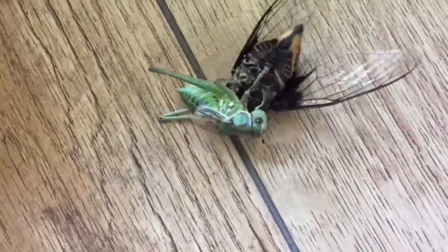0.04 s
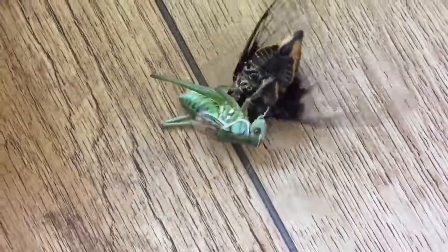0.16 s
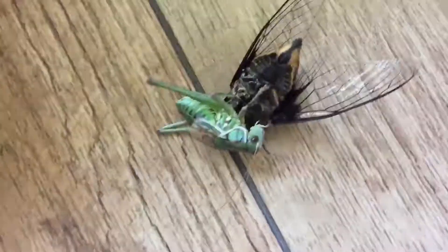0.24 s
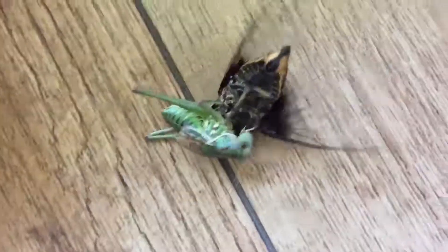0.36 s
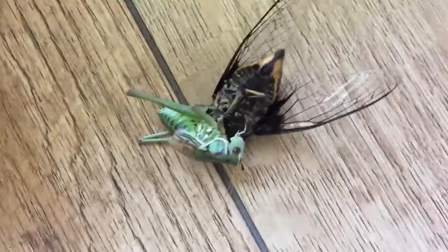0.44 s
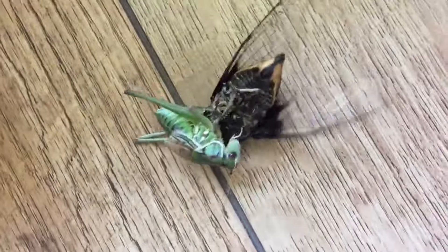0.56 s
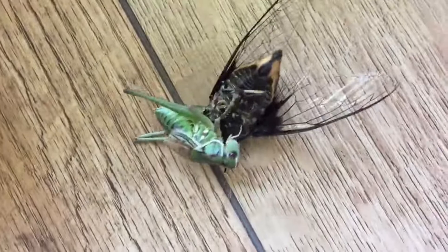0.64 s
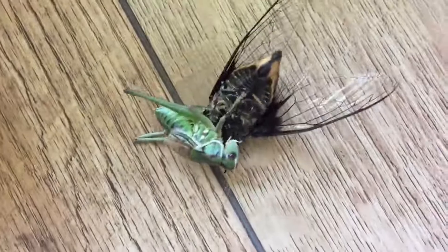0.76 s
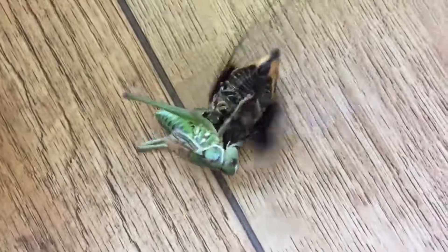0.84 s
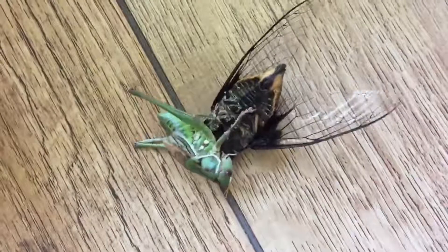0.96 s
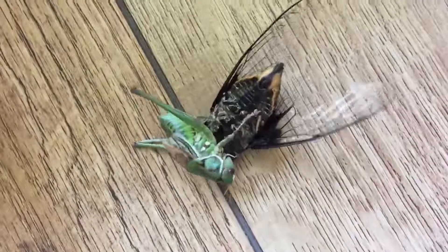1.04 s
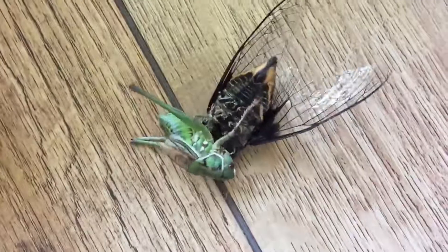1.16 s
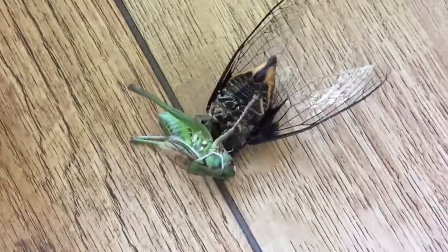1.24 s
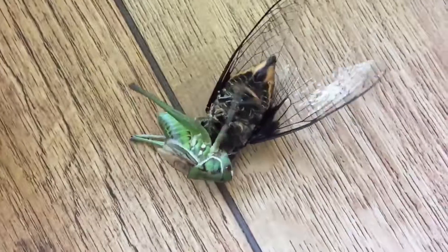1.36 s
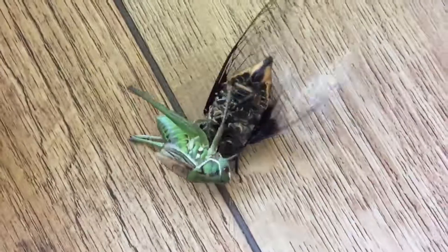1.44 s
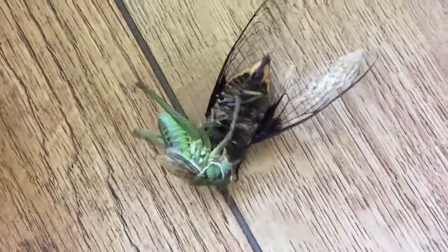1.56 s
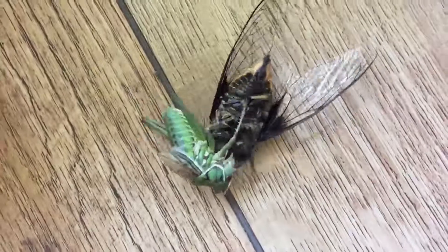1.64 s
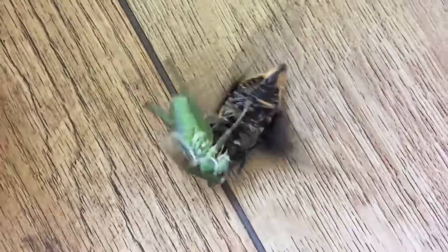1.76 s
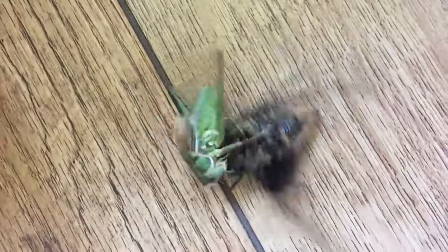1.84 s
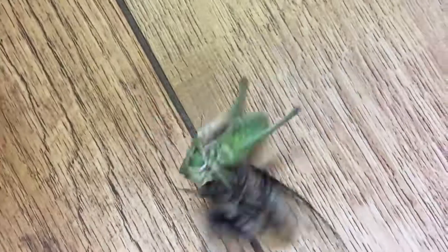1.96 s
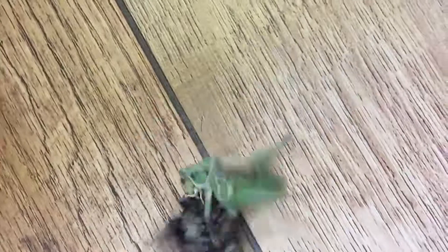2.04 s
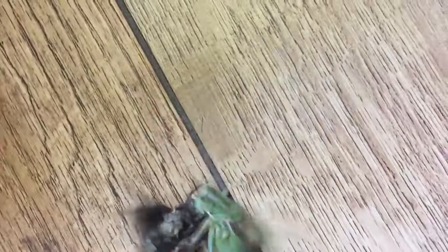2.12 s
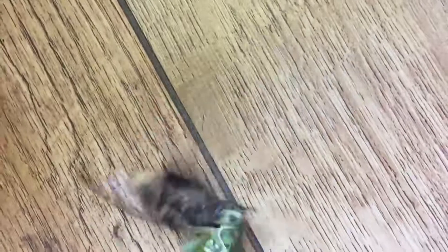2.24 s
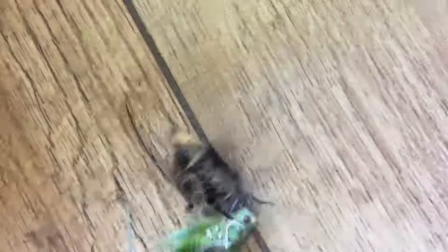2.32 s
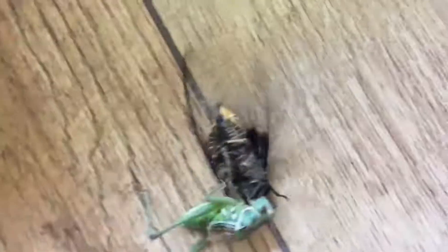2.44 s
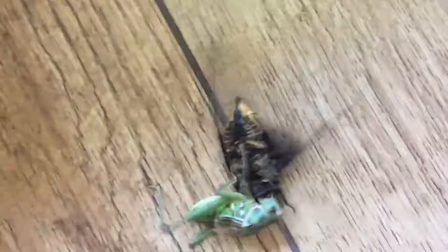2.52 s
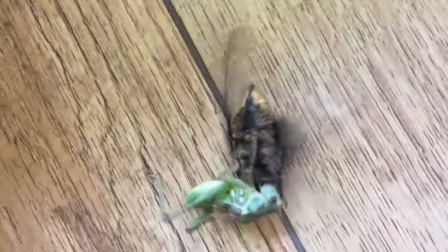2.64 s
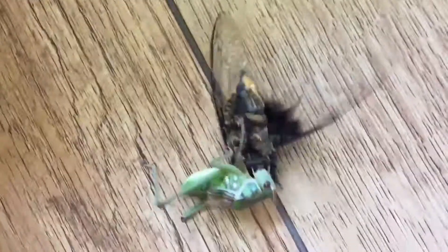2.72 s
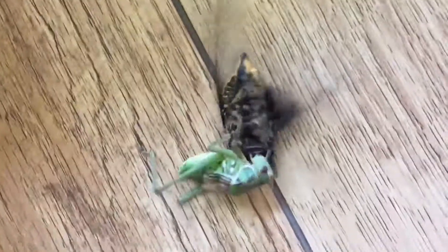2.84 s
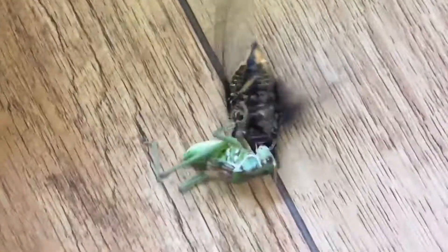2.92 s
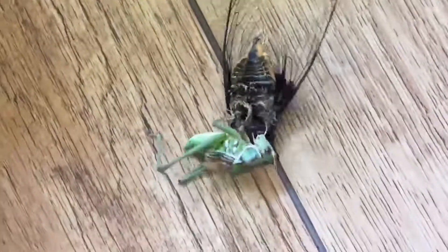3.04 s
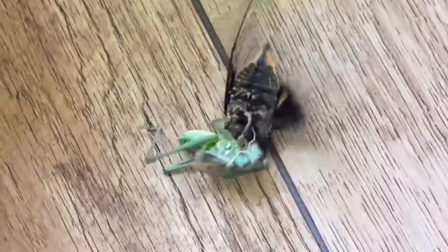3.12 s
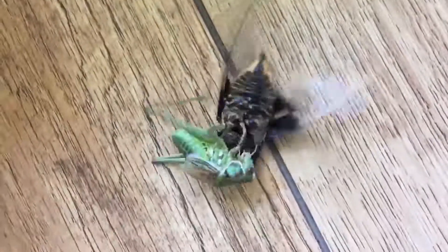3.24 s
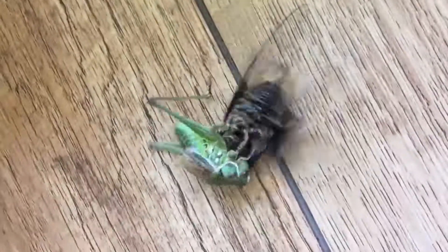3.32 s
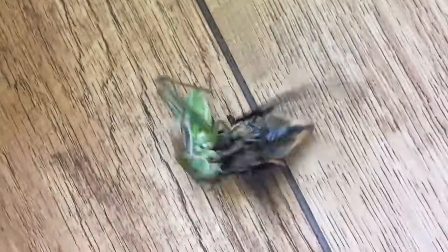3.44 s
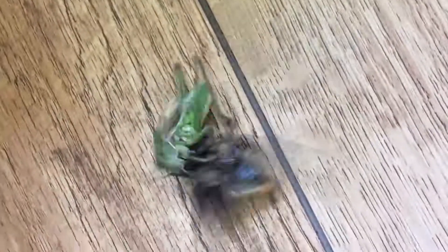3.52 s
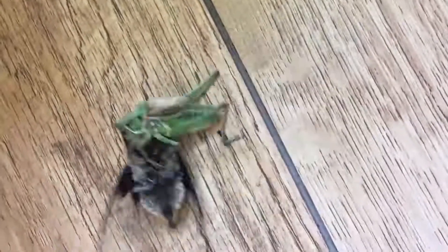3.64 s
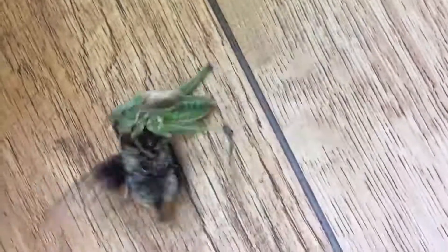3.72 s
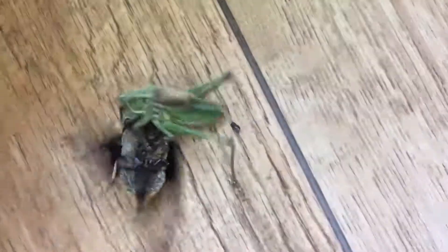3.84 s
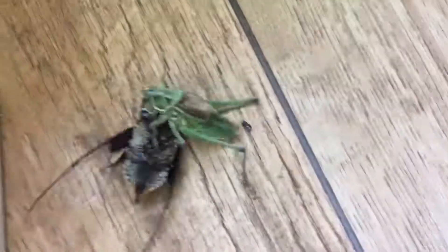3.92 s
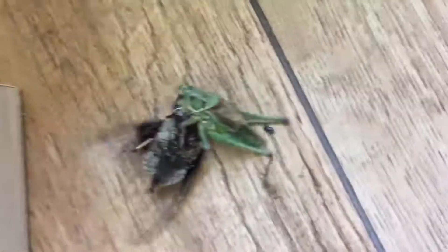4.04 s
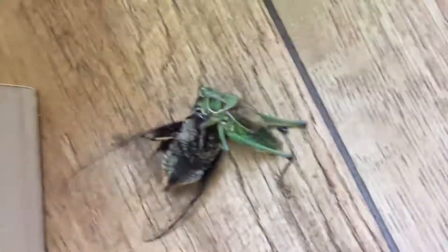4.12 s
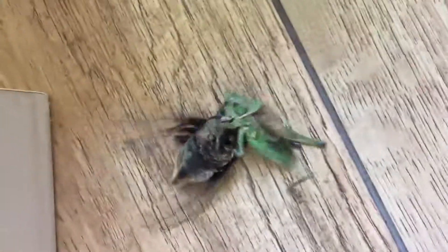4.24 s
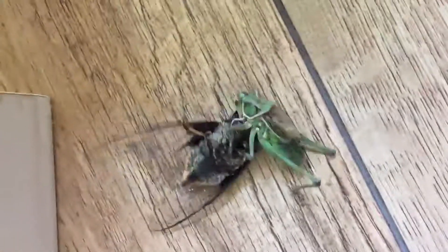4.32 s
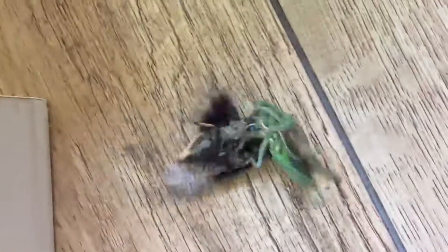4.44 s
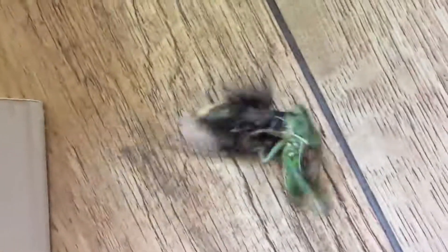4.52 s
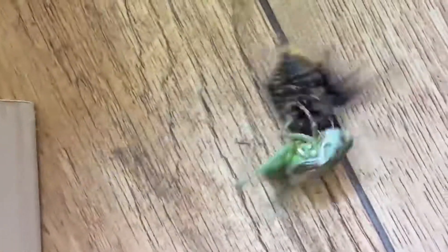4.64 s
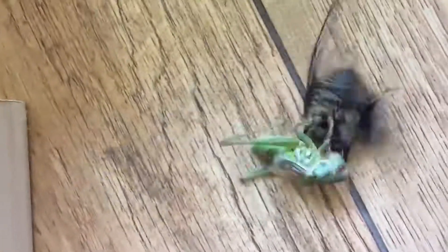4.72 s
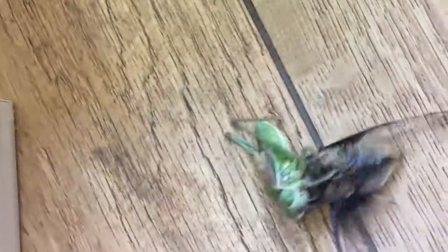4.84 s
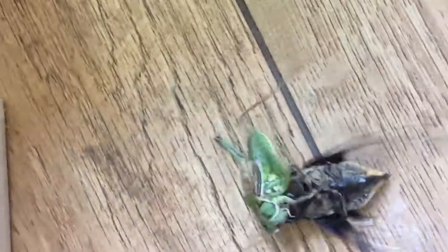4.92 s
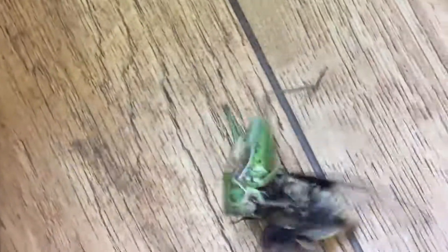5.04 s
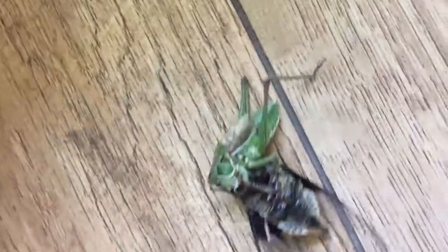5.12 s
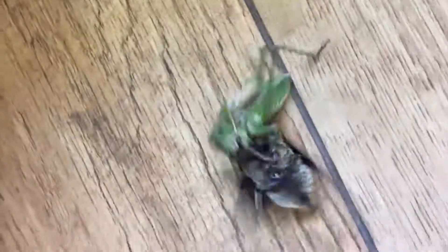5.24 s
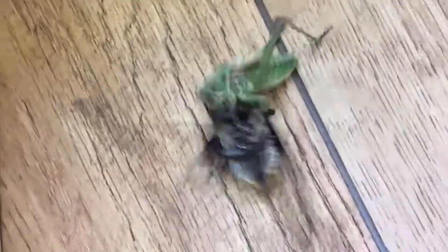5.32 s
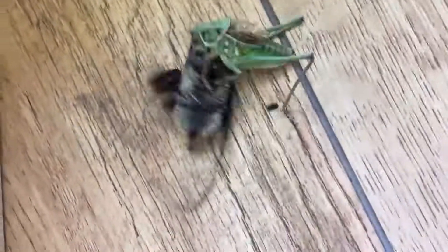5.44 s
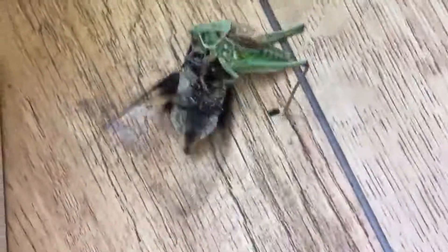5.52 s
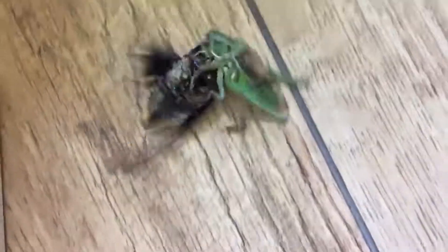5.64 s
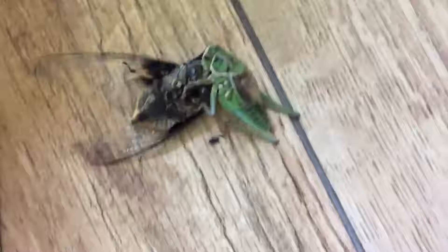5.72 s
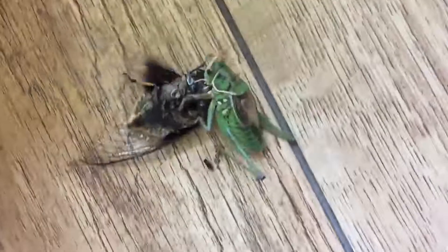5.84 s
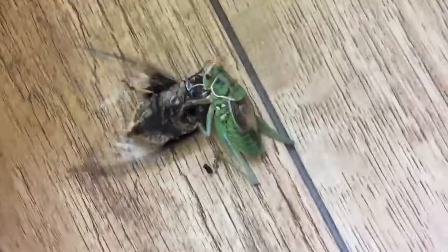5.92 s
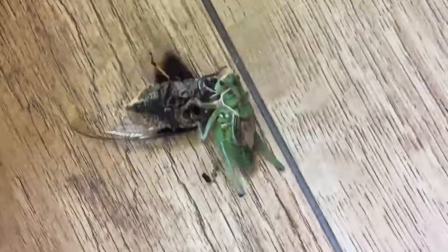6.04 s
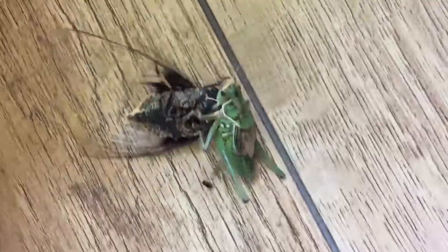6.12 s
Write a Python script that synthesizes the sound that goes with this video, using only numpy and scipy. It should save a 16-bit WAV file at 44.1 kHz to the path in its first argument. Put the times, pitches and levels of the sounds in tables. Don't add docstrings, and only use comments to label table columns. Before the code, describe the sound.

A large insect's stiff wings slap wooden boards, first singly, then in fast rattling bursts, as a rough drone and hiss swell outside.

```python
import sys
import numpy as np
from scipy import signal
from scipy.fft import rfft, irfft, next_fast_len
from scipy.io import wavfile
from scipy.ndimage import uniform_filter1d

SR = 44100
rng = np.random.default_rng(int(sys.argv[2]) if len(sys.argv) > 2 else 0)


def invert_db(x):
    u = np.asarray(x, float) / 20
    return 10 ** u


def to_wav(sig):
    pcm = np.clip(np.atleast_2d(sig), -1, 1) * 32767
    pcm = np.round(pcm).astype(np.int16)
    wavfile.write(sys.argv[1], SR, pcm.T)


N = 272097
STROKE, LONG = 2048, next_fast_len(N)

# (f/Hz, width/Hz, level/dB)
WING_MODES = [(357.4, 157, -15.5), (588, 260, -20.5), (1337, 1125, -5.5), (2388, 507, 1.5), (3187, 564, -3),
              (4390, 680, -3.5), (5150, 515, -2), (6154, 880, -0.5), (7055, 1230, -2), (9130, 2060, -5.5),
              (11534, 1120, -5), (13540, 2300, -8)]
# (f/Hz, width/Hz)
OVERTONES = [(1408, 190), (1750, 190), (2120, 95)]


def level(x, db):
    return x * invert_db(db) / np.sqrt(np.mean(x ** 2))


def modes(table, size):
    f = np.fft.rfftfreq(size, 1 / SR)
    total = 0
    for k, (hz, width, db) in enumerate(table):
        damping = 1j * f * width
        total = total + (-1) ** k * invert_db(db) * damping / (hz ** 2 - f ** 2 + damping)
    return total


def shape(x, response):
    return irfft(rfft(x) * response, x.shape[-1])


def band(hz, width):
    noise = rng.standard_normal(LONG)
    return level(shape(noise, modes([(hz, width, 0)], LONG) ** 2)[:N], 0)


def curve(table, col):
    table = np.array(table)
    return np.interp(np.arange(N) / SR, table[:, 0], table[:, col])


def walk(rate):
    k = int(SR / rate)
    held = np.repeat(rng.standard_normal(N // k + 1), k)
    return 1.4 * uniform_filter1d(held, k)[:N]


def place(times, grains):
    out = np.zeros(N + 2 * STROKE)
    for s, grain in zip(times, grains):
        i = int(s * SR)
        out[i:i + STROKE] += grain
    return out[:N]


def bump(ms, at, rise, fall):
    d = ms - at
    return np.where(d < 0, np.exp(np.minimum(d, 0) / rise), np.exp(-np.maximum(d, 0) / fall))


def beats():
    # (first slap t/s, last slap t/s, slaps, peak level/dB)
    run_table = [(.1607, .205, 2, -14), (1.7416, 1.946, 8, -6.5), (1.9718, 2.0784, 5, -7.5),
                 (2.1036, 2.3342, 10, -8), (2.3602, 2.4447, 4, -9), (2.574, 2.7619, 8, -9.5),
                 (2.8565, 2.972, 5, -10.5), (3.0034, 3.039, 2, -11.5), (3.1307, 3.162, 2, -8.5),
                 (3.237, 3.268, 2, -6.5), (3.3278, 3.4417, 5, -10.5), (3.4695, 3.662, 8, -8),
                 (3.769, 3.8027, 2, -7.5), (3.8899, 3.9236, 2, -7.5), (4.0312, 4.0644, 2, -6.5),
                 (4.2401, 4.3045, 3, -8), (4.4556, 4.515, 3, -8.5), (4.5487, 4.7223, 7, -8),
                 (4.784, 4.8976, 5, -8), (5.0456, 5.1324, 4, -6.5), (5.2451, 5.3354, 4, -6),
                 (5.3631, 5.4754, 5, -7.5), (5.63, 5.7184, 4, -7.5), (5.835, 5.8682, 2, -8),
                 (6.0245, 6.059, 2, -9)]
    # (t/s, peak level/dB)
    lone_slaps = [(.392, -12), (0.5602, -12.5), (.8913, -9.5), (.9292, -14), (1.4564, -4.5), (2.5451, -9.5),
                  (4.113, -11.5), (4.425, -5), (4.7546, -6), (5.0102, -2), (5.5956, -7), (5.9906, -8.5)]
    rest_s = .045
    start_lag, end_lag, end_lag_beats = .22, .14, .8
    runs = sorted([*run_table, *[(s, s, 1, db) for s, db in lone_slaps]])
    rows = []
    for k, (first, last, count, db) in enumerate(runs):
        opens = k == 0 or first - runs[k - 1][1] > rest_s
        closes = k + 1 == len(runs) or runs[k + 1][0] - last > rest_s
        n = np.arange(round(count))
        tiring = np.exp((n - n[-1]) / end_lag_beats)
        gap = 1 + opens * start_lag * (n == 1) + closes * end_lag * tiring
        done = np.cumsum(gap) - gap[0]
        times = first + (last - first) * done / max(done[-1], 1)
        rows.append([times, db + 0 * n, opens & (n == 0), closes & (n == n[-1]) & (n > 0)])
    return np.concatenate(rows, axis=1)


def slaps():
    # (t/s, wing base level/dB, wing tip level/dB, contact/ms, upstroke level re slap/dB)
    posture = [(.2, -12.5, -18, 2.5, -14), (.9, -15, -19, 2.5, -20.5), (1.46, -23, -19, 2, -32),
               (1.8, -18.5, -16, 1.96, -23), (1.97, -25.5, -18, 2.7, -49), (2.1, -26, -18, 2.6, -27),
               (2.27, -22.5, -16.5, 3, -25), (2.4, -27, -18, 3.3, -24), (3.04, -28.5, -21, 3.44, -22),
               (3.15, -21, -21.5, 2.4, -19), (3.45, -14.5, -13, 2.44, -16), (3.62, -24, -19.5, 2.76, -24.5),
               (3.88, -23.5, -16.5, 2.8, -27), (4.05, -12.5, -7.5, 2.57, -21), (4.45, -17.5, -18, 2, -17.5),
               (5.08, -16, -16, 2.14, -25.5), (5.3, -18, -17.5, 2.24, -17.5), (6.05, -14, -16, 2, -20.5)]
    first_contact, first_base_db, last_db = 0.78, -3.5, -1.5
    scatter_db, base_scatter_db, tip_scatter_db, up_scatter_db = .8, 2, 1.5, 2.5
    contact_scatter, spread_db = .12, -1
    s, db, opens, closes = beats()
    base, tip, contact, up = (curve(posture, k)[(s * SR).astype(int)] for k in range(1, 5))
    luck = np.clip(rng.standard_normal((len(s), 5)).T, -1.6, 1.6)
    return np.array([
        s,
        db + last_db * closes + scatter_db * luck[0] + spread_db * luck[3],
        base + first_base_db * opens + base_scatter_db * luck[1],
        tip + tip_scatter_db * luck[2],
        contact * first_contact ** opens * np.exp(contact_scatter * luck[3]),
        up + up_scatter_db * luck[4]])


def crackle(count, scatter_db):
    draw = rng.standard_normal((count, 2, STROKE))
    sizes_db = scatter_db * np.repeat(draw[:, 1, ::8], 8, axis=1)
    return draw[:, 0] * invert_db(sizes_db)


def wings():
    s, peak_db, mid_db, top_db, contact, up_db = slaps()[:, :, None]
    ms = np.arange(STROKE) / SR * 1000 - 5
    luck = rng.random((len(s), 4)).T[:, :, None]
    contact = np.clip(contact, .4, 8)

    roll = np.exp(-(np.maximum(ms - .6, 0) / (2.52 * contact)) ** 3) * bump(ms, 0.576, 0.22, 8.63)
    second_ms = 0.83 + 1.137 * contact * (0.683 + .5 * luck[1])
    slap = 0.797 * bump(ms, 0.65, 0.2, 0.75) + 0.078 * contact ** 2 * roll
    slap = slap + 0.047 * contact ** 2 * luck[0] * bump(ms, second_ms, 0.25, 0.31)
    slap = slap + invert_db(-23.0) * bump(ms, 0, 2.54, 2.3)
    up = bump(ms, 12.3 + 3.8 * luck[2], 0.73, 3.09) + 0.54 * bump(ms, 6.5, 3.3, 25.0)
    up = invert_db(up_db) * up

    f = np.fft.rfftfreq(STROKE, 1 / SR)
    tilt = (mid_db + 12.5) / (1 + (f / 3000) ** 4) / (1 + (550 / (f + 1)) ** 3)
    tilt = tilt + (top_db + 20) / (1 + (8000 / (f + 1)) ** 6)
    patch_db, patch_hz = 2.5, 700
    snaps = crackle(len(s), scatter_db=3.0)
    knots = rng.standard_normal((len(s), 40))
    tilt = tilt + patch_db * np.array([np.interp(f / patch_hz, np.arange(len(k)), k) for k in knots])
    body = invert_db(tilt) * modes(WING_MODES, STROKE)

    crack = 6.96 / contact * np.sign(luck[3] - .3) * np.exp(-((ms - .55) / 0.029) ** 2)
    blow = snaps * slap + crack
    uneven = uniform_filter1d(np.abs(rfft(blow)) ** 2, size=40, axis=1)
    even = (uneven / uneven.mean(axis=1, keepdims=True)) ** -.14
    down = shape(blow, body * even)
    energy = np.sqrt(np.sum(down ** 2, axis=1, keepdims=True) / contact)
    usual_peak = np.median(np.abs(down).max(axis=1, keepdims=True) / energy)
    scale = invert_db(peak_db) / energy / usual_peak
    return place(s[:, 0] - .005, scale * (down + shape(snaps * up, body)))


def ticks():
    # (t/s, peak level/dB)
    touches = [(0.155, -31), (0.3878, -33), (0.554, -39), (0.9215, -26), (1.3254, -62), (1.3704, -62),
               (1.4784, -45), (1.6187, -49), (1.7055, -49), (5.5224, -39), (5.7564, -46)]
    s, peak_db = np.array(touches).T
    ms = np.arange(STROKE) / SR * 1000
    g = crackle(len(s), scatter_db=3.0) * bump(ms, 0.27, 0.1, 1.0)
    g = shape(g, modes(WING_MODES[5:], STROKE))
    return place(s, g * invert_db(peak_db)[:, None] / np.abs(g).max(axis=1, keepdims=True))


def beating():
    hold_s, rise_db_s, fall_db_s = 0.035, 900, 476
    wake_s = 0.014
    s, _, opens, _ = beats()
    s = np.concatenate([[-1], s + wake_s * opens, [N / SR + 1]])
    t = np.arange(N) / SR
    k = np.searchsorted(s, t)
    waited = wake_s * np.r_[0, opens][k - 1]
    rising = -rise_db_s * (s[k] - t)
    sinking = -fall_db_s * np.maximum(t - s[k - 1] - hold_s + waited, 0)
    return np.maximum(rising, sinking)


def strokes(delays_ms, ring, rough, rest, scatter_db):
    s = beats()[0]
    push = np.zeros(N + SR)
    size = invert_db(scatter_db * rng.standard_normal((len(s), len(delays_ms))))
    for k, (ms, db) in enumerate(delays_ms):
        push[((s + ms / 1000) * SR).astype(int)] += invert_db(db) * size[:, k]
    drive = level(push[:LONG], 0) + rough * rng.standard_normal(LONG)
    x = shape(drive, modes(ring, LONG) ** 2)[:N]
    power = uniform_filter1d(uniform_filter1d(x ** 2, 3000), 3000)
    return x / np.sqrt(power / np.mean(x ** 2) + rest) / np.std(x)


def air():
    # (t/s, low air level/dB, board thud level/dB)
    vigour = [(.2, -58.5, -49.5), (.58, -58, -51.5), (.93, -58, -51), (1.46, -66, -82), (1.79, -57, -44),
              (2.04, -46, -51), (2.47, -49.5, -44.5), (2.62, -46, -43.5), (2.9, -47.5, -44.5),
              (3.14, -55.5, -48.5), (3.6, -50.5, -43), (4.14, -52, -49), (4.9, -59.5, -43), (5.1, -48, -47),
              (5.3, -58.5, -42.5), (5.7, -49, -46), (6.05, -53.5, -46)]
    still_air_db, still_thud_db = -67, -76
    pump = strokes([(-6.0, 0)], [(98, 90, 0)], rough=.2, rest=.02, scatter_db=1.2)
    thud = strokes([(1.0, 5.2), (13.5, 2.7), (42.0, 1.07)], [(320.5, 247, 1), (805, 750, -10.5)],
                   rough=0.39, rest=0.19, scatter_db=5.5)
    gate_db = beating()
    pump_db = np.maximum(curve(vigour, 1) + gate_db, still_air_db)
    thud_db = np.maximum(curve(vigour, 2) + gate_db, still_thud_db)
    return invert_db(pump_db) * pump + invert_db(thud_db) * thud


def room(x):
    # (f/Hz, t60/s, level/dB)
    echo_bands = [(325, 0.14, -15.5), (990, 0.59, -27), (2500, 0.22, -18.5), (6000, 0.085, -31),
                  (12200, 0.3, -20.5)]
    size = SR // 2
    t = np.arange(size) / SR
    tail = 0
    for hz, t60, db in echo_bands:
        echo = shape(rng.standard_normal(size), modes([(hz, hz, 0)], size))
        echo = echo * 1000. ** (-t / t60) * np.minimum(t / 0.0036, 1)
        tail = tail + invert_db(db) * echo / np.sqrt(np.sum(echo ** 2))
    return signal.fftconvolve(x, tail)[:N]


def overtone(k):
    # (t/s, peak level/dB, time to sink 10 dB/s, overtone f/Hz)
    swells = [(1.53, -61, .07, 2120), (1.69, -62, .05, 1408), (3.1, -61, 1.1, 1408), (3.1, -63.5, .6, 1750),
              (3.2, -59, 3, 2120), (3.62, -58, 0.5, 1408), (3.84, -49, 0.12, 1408),
              (3.82, -55.5, .12, 2120), (4.03, -53.5, 0.5, 1750), (4.18, -56, .15, 2120),
              (4.15, -59, 0.7, 1408), (4.9, -62, 5, 1408), (5.95, -61, 0.5, 1408), (6.1, -70, 7, 1750)]
    rest_db = [-75, -72.5, -70.5]
    t = np.arange(N) / SR
    db = np.full(N, 1. * rest_db[k])
    for s, peak_db, sink_s, hz in swells:
        if abs(hz / OVERTONES[k][0] - 1) < .1:
            db = np.maximum(db, peak_db - 10 * np.abs(t - s) / sink_s)
    return db


def outside():
    # (t/s, broad drone level/dB, hiss level/dB)
    backdrop_levels = [(0.0, -65.5, -62.5), (1.77, -65.5, -60), (1.92, -50, -64), (2.1, -47.5, -51),
                       (3.18, -46.5, -49), (3.47, -43.5, -43), (3.8, -43.5, -47.5), (4.33, -44, -46.5),
                       (4.67, -40.5, -51), (5.12, -44.5, -44.5), (5.22, -45, -48), (6.17, -52, -50.5)]
    # (f/Hz, density/dB per Hz)
    hush_tilt = [(18, -55), (30, -12), (112, -3), (131, -5.5), (227, -14.5), (584, -29), (702, -37),
                 (1160, -26), (1390, -32), (3140, -30.5), (6210, -28.5), (14400, -65), (16000, -56)]
    hush_db = -57
    whine = 0
    for k, (hz, width) in enumerate(OVERTONES):
        db = overtone(k)
        tone = np.sin(2 * np.pi * np.cumsum(hz + 9.0 * walk(10)) / SR) * np.clip((db + 67) / 6, 0, 1.5)
        whine = whine + invert_db(db + walk(16)) * (tone + 0.708 * band(hz, width))
    whine = whine + invert_db(overtone(k=1)) * (invert_db(-8.5) * band(702, 75) + invert_db(-4.5) * band(2450, 150))
    drone = invert_db(curve(backdrop_levels, 1) - 7.0 + 0.58 * walk(9)) * band(1890, 1560)
    hiss = invert_db(curve(backdrop_levels, 2) - 4.5 + 2.25 * walk(36)) * band(4440, 4580)
    hz, db = np.array(hush_tilt).T
    tilt = np.interp(np.log(np.fft.rfftfreq(LONG, 1 / SR) + 1), np.log(hz), db)
    hush = shape(rng.standard_normal(LONG), invert_db(tilt))[:N]
    return whine + drone + hiss + level(hush, hush_db - 0.5)


def scene():
    near = wings() + ticks()
    fading = invert_db(-51) * band(4730, 13000) * 1000. ** (-np.arange(N) / SR / 0.198)
    mono = near + room(near) + fading + air() + outside()
    return np.array([mono, mono])


def low_pass(x):
    return signal.sosfilt(signal.butter(12, 16470, fs=SR, output="sos"), x)


def record(dry):
    lowpass = signal.ellip(6, .5, 45, 15500, fs=SR, output="sos")
    top = signal.sosfilt(lowpass, dry[0])
    f, _, z = signal.stft(top, SR, nperseg=512)
    power = uniform_filter1d(np.abs(z) ** 2, size=6, axis=0)
    wide = uniform_filter1d(power, size=60, axis=0)
    between = wide < .6 * uniform_filter1d(wide, size=7, axis=1)
    weak = power < invert_db(-6.5) * wide
    z = np.where(between & weak & (f[:, None] > 5500), invert_db(-18) * z, z)
    third = (3 * np.log2(f + 50)).astype(int) - 16
    patch = rng.random((40, z.shape[1] // 4 + 1))[third].repeat(4, axis=1)
    apart = (patch[:, :z.shape[1]] < .33) & (f[:, None] > 450)
    turned = z * np.exp(2j * np.pi * rng.random(z.shape))
    mid = signal.istft(z, SR, nperseg=512)[1][:N]
    side = signal.istft(invert_db(-21) * apart * turned, SR, nperseg=512)[1][:N]
    return low_pass(np.array([mid + side, mid - side]))


dry = scene()
out = record(dry)
to_wav(out)
```